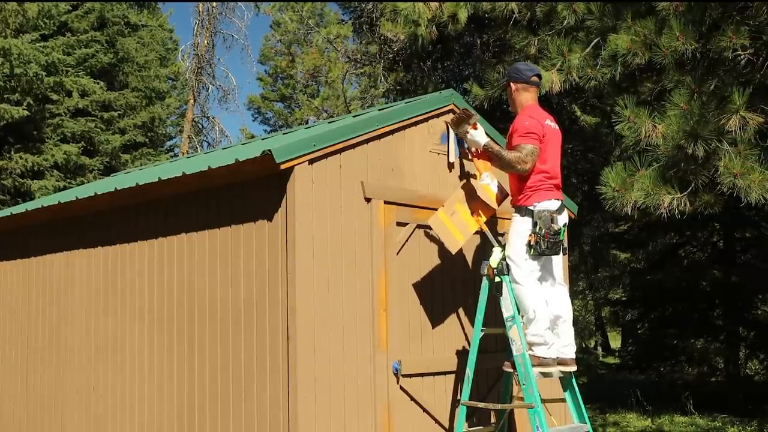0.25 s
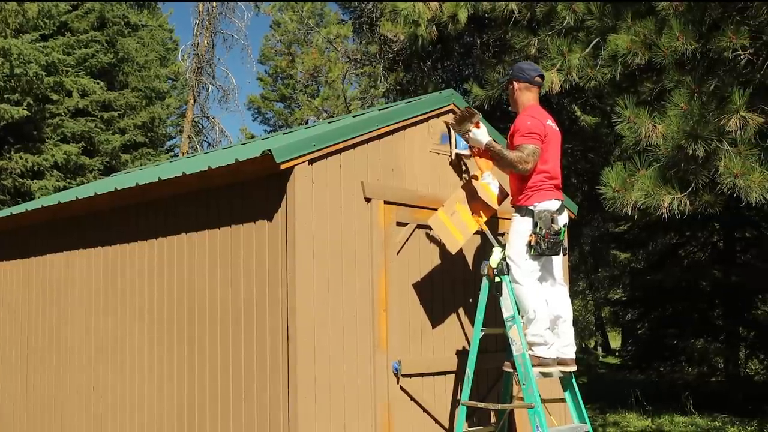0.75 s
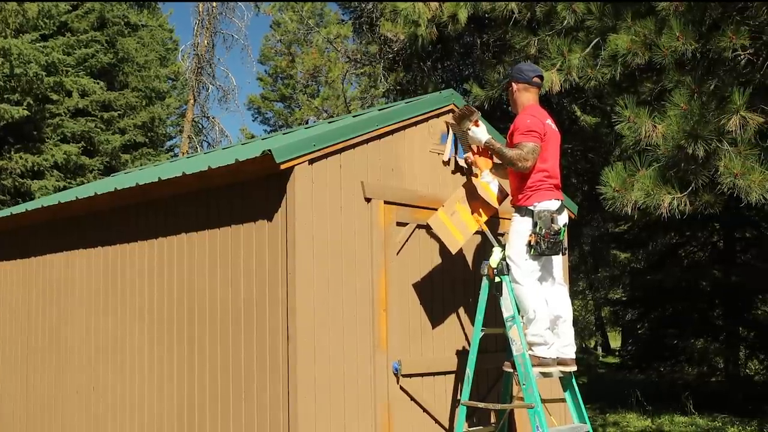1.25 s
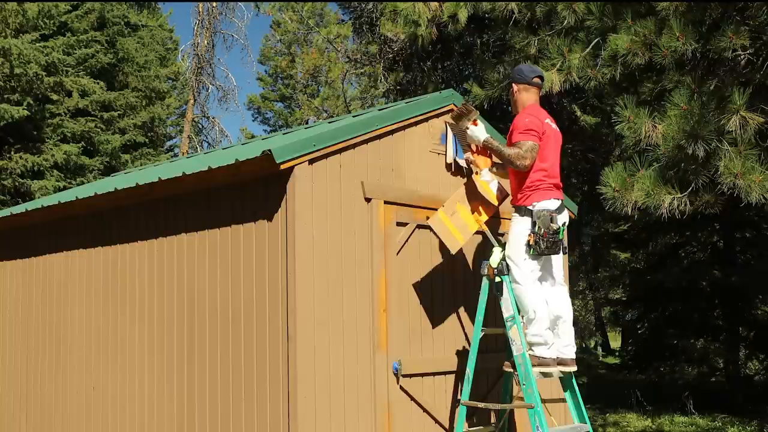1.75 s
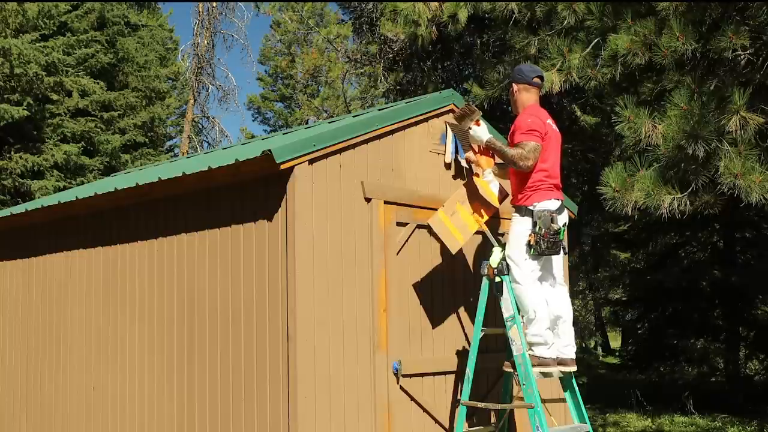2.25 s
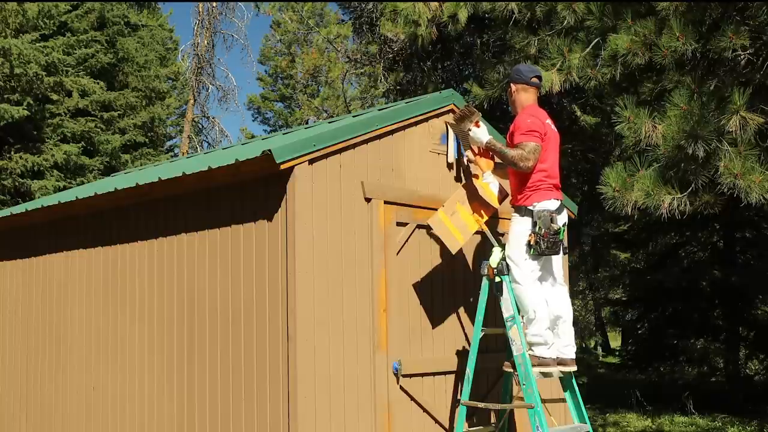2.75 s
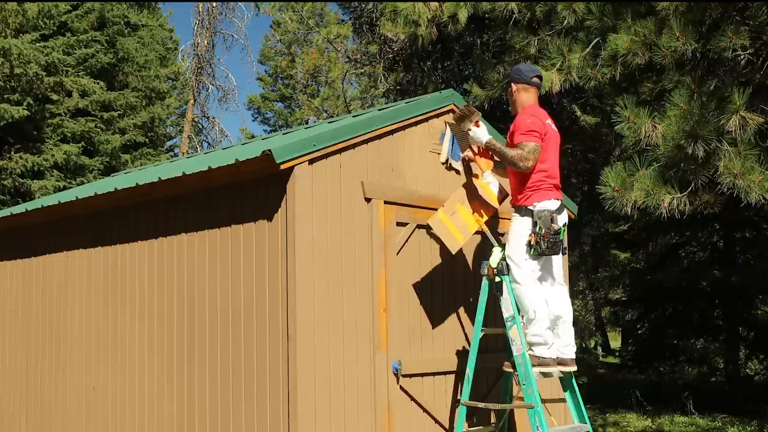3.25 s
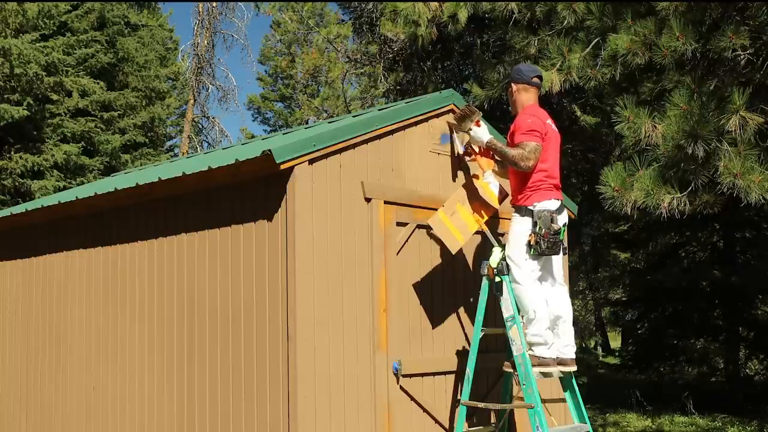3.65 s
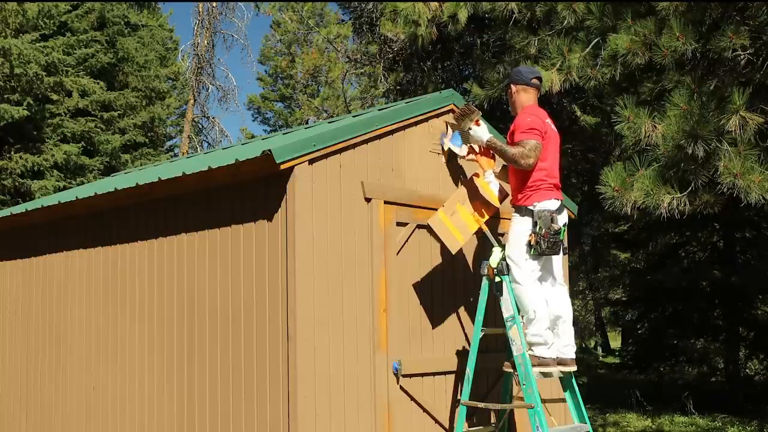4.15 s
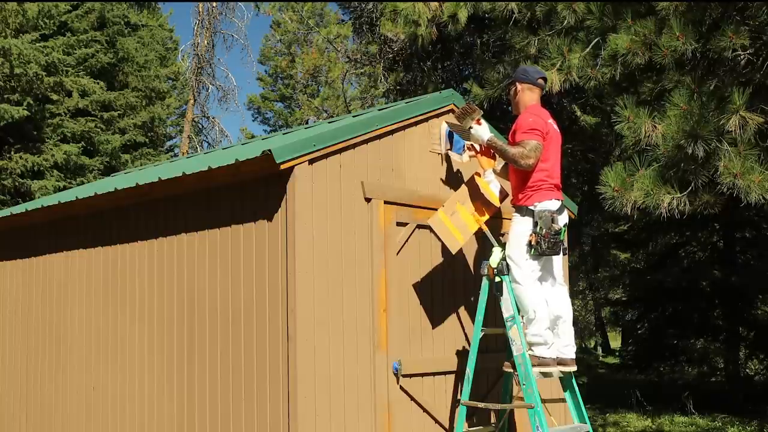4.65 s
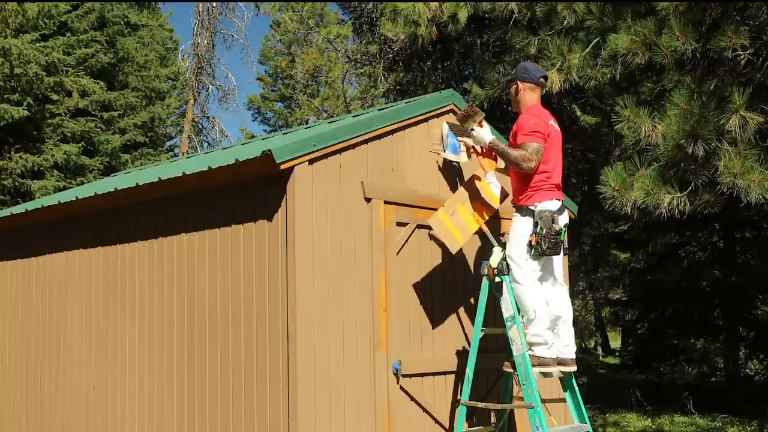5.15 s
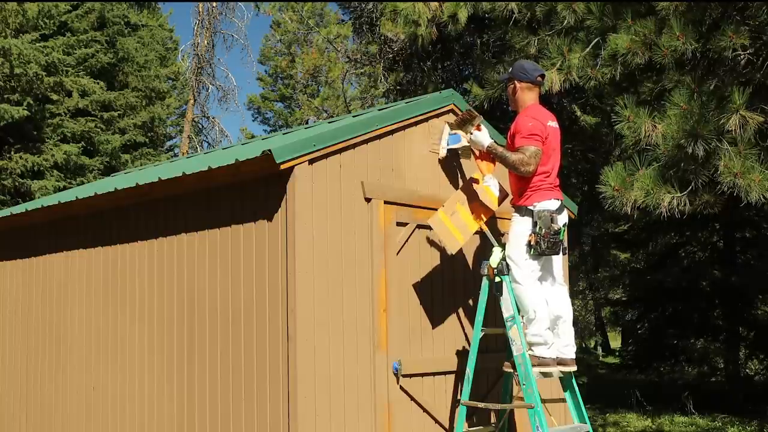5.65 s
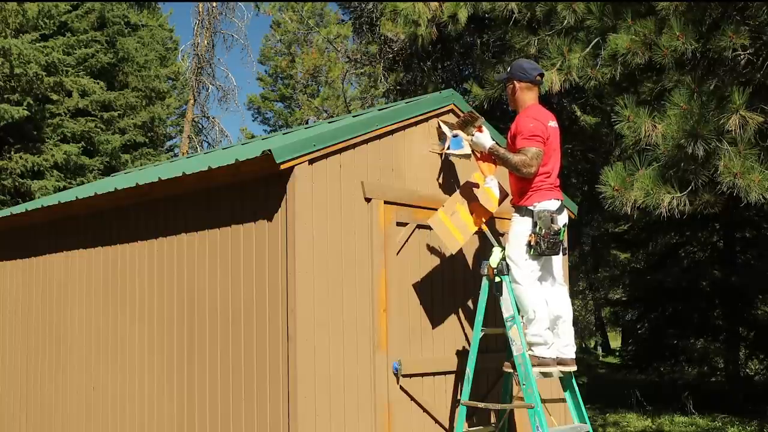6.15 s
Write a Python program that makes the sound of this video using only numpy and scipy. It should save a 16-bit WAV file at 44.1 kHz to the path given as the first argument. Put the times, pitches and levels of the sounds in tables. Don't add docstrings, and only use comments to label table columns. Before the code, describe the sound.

Close, dry sound of masking tape and paper being pulled off a hollow wooden wall outdoors. A crackling opening pull, a pause, a short thumping jerk, a quick rip, then a longer crackling pull and crumpling. After faint handling, a new grip leads into a finer, even peel. Very soft distant traffic and pine air lie beneath, almost no echo.

```python
import sys
import numpy as np
from scipy import signal
from scipy.fft import rfft, irfft, next_fast_len
from scipy.io import wavfile
from scipy.ndimage import uniform_filter1d, map_coordinates

SR = 44100
rng = np.random.default_rng(int(sys.argv[2]) if len(sys.argv) > 2 else 0)


def gain_from_decibels(decibels):
    exponent = np.asarray(decibels, float) / 20
    return 10 ** exponent


def to_wav(s):
    ch = np.atleast_2d(s).T
    pcm = np.round(np.clip(ch, -1, 1) * 32767)
    wavfile.write(sys.argv[1], SR, pcm.astype(np.int16))


N = 283122

# freq_hz, level_db
AIR_SPECTRUM = [(15, -35), (30, 2), (60, -2), (95, -1.5), (130, -8.5), (280, -18.5), (560, -16), (740, -12),
                (1100, -12.5), (1780, -15.5), (2000, -21.5), (2700, -29.5), (5000, -36.5), (11000, -41),
                (16000, -45)]
# time_s, level_db
AIR_LEVEL = [(0, -61), (.7, -58), (1.3, -59), (1.65, -57), (2.5, -61.5), (3.2, -61.5), (4.9, -61.5),
             (5.6, -59.5)]
# start_s, peak_db
THUDS = [
    (1.8556, -33),
    (1.8652, -25),
    (1.879, -31),
    (1.888, -34),
    (2.925, -30.5),
    (3.978, -33),
    (0.276, -31),
    (0.334, -51),
    (5.921, -32),
]
# start_s, peak_db
KNOCKS = [
    (4.475, -36),
    (4.549, -33),
    (4.561, -40),
    (4.618, -39),
]
# freq_hz, width_hz, level_db
WALL_MODES = [(95.9, 6.8, 1.5), (43, 18, -11.5), (177, 42, -13), (228.4, 13.8, -7), (348, 100, -9.5),
              (479, 95, -7.5), (785, 64, -7)]
# start_s, peak_db, slap_over_peak_db
TUGS = [(0.16, -56, 20), (0.205, -56, 23), (0.249, -45, 18), (0.327, -51, 22), (0.395, -56, 25),
        (0.679, -51, -4), (1.857, -40, -7), (1.878, -48, -6), (2.839, -44, 12.5), (2.9201, -31, 0),
        (2.93, -39.5, 5.5), (3.628, -40.5, -21), (3.864, -41.5, -17), (3.976, -33, -23), (4.222, -45, 12.5),
        (4.473, -53, 14), (4.573, -39, 10.5), (4.619, -45, 11), (4.724, -53.5, 14), (4.797, -74, 10),
        (5.163, -65, 26.5), (5.204, -71, 25), (5.283, -57.5, 17), (5.38, -62, 16), (5.919, -35.5, 9),
        (5.944, -33.5, -17), (5.974, -41, -5), (6.376, -45.5, 7)]
# start_s, peak_db, length_ms
FUMBLES = [(0.734, -46, 24), (0.766, -54, 33), (0.9882, -58, 22), (1.0365, -47, 7.9), (1.0827, -44, 31),
           (1.43, -47, 21), (1.7215, -53, 18), (1.7694, -63, 44), (2.008, -46, 13), (2.0437, -41.5, 40),
           (2.3875, -51.5, 43), (2.614, -49, 21), (2.72, -43, 22), (2.9644, -49.5, 37), (2.9944, -51, 38),
           (3.0759, -61, 18), (3.103, -47, 59), (3.1475, -48, 27), (3.254, -42.5, 38), (3.2895, -47, 22),
           (3.3094, -49, 20), (3.377, -37.5, 20), (4.901, -44, 53), (5.037, -42.5, 59), (5.078, -45, 36),
           (5.152, -41.5, 29), (5.1924, -43, 41), (5.2394, -48, 30), (5.3744, -40.5, 16), (5.448, -51, 35)]
# time_s, effort_db
OPENING = [(0, -77), (.14, -45.5), (.2, -43.5), (.29, -36.5), (.39, -36), (.41, -41.5), (.46, -39),
           (.61, -57.5), (.64, -76)]
JERK = [(1.85, -81), (1.858, -44), (1.905, -42), (1.925, -82), (1.975, -54.5), (1.992, -49), (2.0, -89),
        (2.03, -78)]
RIP = [(2.74, -63), (2.765, -54.5), (2.81, -42.5), (2.85, -50), (2.925, -42.5), (2.945, -62), (2.96, -66)]
PLUCK = [(3.37, -76), (3.47, -67.5), (3.56, -62), (3.605, -51.5), (3.625, -39.5), (3.66, -49.5), (3.7, -54)]
LONG = [(3.7, -53.5), (3.78, -49.5), (3.84, -46), (3.9, -41.5), (3.95, -38.5), (3.995, -41), (4.02, -43.5),
        (4.11, -48.5), (4.15, -60)]
CATCH = [(4.148, -67), (4.2, -68), (4.235, -43.5), (4.25, -67), (4.31, -78), (4.35, -61)]
CRUMPLE = [(4.35, -62), (4.43, -44.5), (4.55, -41.5), (4.585, -54.5), (4.63, -43), (4.665, -55.5),
           (4.69, -64), (4.85, -65.5), (4.875, -103)]
REGRIP = [(5.5, -74.5), (5.65, -69), (5.69, -55), (5.78, -58.5), (5.845, -52), (5.9, -48.5), (5.925, -38),
          (5.97, -50.5)]
EVEN = [(5.97, -47.5), (6.2, -44.5), (6.35, -44.5), (6.42, -39)]
# effort table, edge_over_tear_db, sheet_over_tear_db
HAND = [
    (OPENING, -1.1, 2.5),
    (JERK, -6.5, 7.3),
    (RIP, -2.7, 5.1),
    (PLUCK, 2.6, -0.65),
    (LONG, 2.1, 3.4),
    (CATCH, -0.97, 3.4),
    (CRUMPLE, -0.66, 6.2),
    (REGRIP, -3, 7.4),
    (EVEN, -0.88, 4.9),
]
# freq_hz, level_db
TEAR_SPECTRUM = [(880, 2), (1500, 4.5), (1840, 1.5), (3080, 2.5), (3380, 3), (5080, -3.5), (6040, -11),
                 (8500, -13), (11000, -31), (18700, -120)]
# freq_hz, level_db
SIZZLE_SPECTRUM = [(4120, -26.5), (7000, -8.5), (7520, -12), (13500, -9.5), (15700, -22.5), (16300, -19),
                   (16500, -27)]
# freq_hz, level_db
SHEET_SPECTRUM = [(71, -27), (120, 0), (227, 1), (290, -4.5), (465, -6), (574, -11), (798, -8.5),
                  (2000, -14.5), (2600, -18), (4400, -120)]
# start_s, end_s, from_hz, to_hz, level_db
STRIP = [(0.365, 0.383, 6300, 6000, -32), (0.527, 0.633, 3160, 3100, -57), (0.515, 0.615, 4600, 4400, -62),
         (2.752, 2.946, 12900, 12700, -56), (3.71, 3.917, 9000, 9650, -54), (3.894, 3.983, 6430, 7000, -40),
         (3.976, 4.003, 2980, 2950, -45), (3.988, 4.078, 8650, 7240, -51), (4.027, 4.142, 2210, 2120, -53),
         (5.38, 5.63, 920, 895, -63.5), (5.666, 5.736, 2190, 1900, -62), (5.674, 5.825, 1750, 1460, -58.5),
         (6.114, 6.6, 2080, 2580, -55), (6.338, 6.47, 8500, 8600, -58)]
# start_s, peak_db, centre_hz, length_ms
CREASES = [(0.2753, -27, 6000, 6), (0.3118, -26.5, 3500, 3), (0.3227, -21, 8000, 5.7),
           (0.372, -21, 6500, 3.2), (0.4193, -31.5, 7970, 4.4), (0.4466, -30, 6010, 6.4),
           (0.474, -31, 7000, 4.9), (0.528, -29, 4700, 1.8), (1.862, -45, 4600, 2.7),
           (1.8858, -46, 4470, 3.2), (1.907, -35.5, 9100, 3.5), (1.9809, -22, 7500, 1.6),
           (2.783, -33, 5900, 1), (2.8276, -41, 6960, 4.1), (2.9224, -30.5, 6600, 1.7),
           (3.5277, -29.5, 6800, 1.8), (3.6196, -45, 8800, 2.6), (3.865, -22, 4970, 1.2),
           (3.9126, -31, 7500, 1.6), (3.939, -21, 7400, 7.3), (3.988, -20.5, 9300, 3.7),
           (4.1805, -29.5, 4750, 6.3), (4.231, -27.5, 7140, 3.5), (4.261, -33.5, 7100, 3.8),
           (4.5288, -32, 5260, 3), (4.5642, -34, 4520, 2.3), (5.7443, -32.5, 6700, 2),
           (5.8637, -35, 4560, 1.64), (5.9108, -25.5, 4930, 1.2), (5.972, -32.5, 6900, 5.6)]
# start_s, peak_db, crisp_over_peak_db
FLAPS = [(0.624, -58, 14), (0.687, -39, -13), (0.849, -41.5, -23), (0.933, -46, -9), (1.9791, -26, -9.5),
         (2.235, -56.5, 9.5), (2.793, -31.5, 3.5), (3.392, -61, 16), (4.518, -40, 7.5), (4.565, -40, -6),
         (4.615, -36, 4), (4.637, -54, -1), (4.724, -53, 12), (4.797, -47, 0), (5.165, -35.5, -16),
         (5.205, -39.5, -9), (5.285, -48.5, -3), (5.385, -63, -15), (5.586, -46, -3.5), (5.662, -31.5, -16),
         (5.746, -38, -10), (5.767, -36, -4.5), (5.925, -46.5, 14), (5.995, -44, -3), (6.254, -49, -6)]
# start_s, peak_db, centre_hz
TICKS = [(0.5541, -23.5, 6600), (0.5654, -30, 9900), (0.624, -31, 6030), (0.6645, -30, 6510),
         (0.6675, -21.5, 6740), (1.897, -26.5, 4100), (2.0764, -40, 8250), (2.8093, -18, 9400),
         (2.9122, -19.5, 9350), (3.132, -42, 8800), (3.3587, -51, 4500), (3.3837, -36, 10100),
         (3.391, -40.5, 4300), (3.418, -33, 6600), (3.4495, -16.5, 9800), (3.5514, -28, 7030),
         (3.5676, -22.5, 6200), (3.6384, -24, 7300), (3.7763, -25, 8900), (3.8225, -21, 5530),
         (4.0025, -11, 8500), (4.174, -35, 4460), (4.1888, -21.5, 4670), (4.361, -17, 9000),
         (4.4191, -23, 4740), (4.7227, -58, 5960), (4.7553, -37.5, 6220), (4.8315, -35, 7000),
         (5.424, -43.5, 7340), (5.8488, -28.5, 4500),
         (0.139, -68, 3400), (0.519, -25, 3780), (0.85, -49, 4000), (1.8567, -28, 8890),
          (1.9674, -45, 7900), (1.986, -37, 3400), (2.0105, -48, 6470), (2.0457, -52, 6500),
          (2.6235, -47, 8560), (2.761, -32, 7070), (2.779, -32, 6350), (2.886, -35, 3800),
          (3.077, -49, 9700), (3.4534, -28, 6200), (3.4973, -44, 7310), (3.577, -33, 7040),
          (3.845, -20.5, 5830), (4.206, -32, 7000), (4.3034, -39, 9100), (4.333, -35, 6670),
          (4.396, -35, 6680), (4.429, -22.5, 6200), (4.5932, -29, 3670), (4.782, -39, 7030),
          (4.855, -42, 6990), (5.051, -47, 6970), (5.3068, -44.5, 8290), (5.724, -44, 4240),
          (5.8147, -43, 7550), (6.3716, -28, 8430),
         (0.0382, -62, 10740), (0.0604, -46, 10000), (0.6291, -42, 7500), (0.6884, -29, 8060),
        (0.7363, -46, 7400), (0.7659, -52, 9700), (0.771, -48, 9600), (0.8236, -48, 7200),
        (0.9816, -64, 9600), (0.9891, -46, 8900), (0.9935, -56, 8900), (1.006, -47, 10500),
        (1.0326, -49, 9900), (1.0848, -52, 8400), (1.3961, -47.5, 9500), (1.7233, -59, 6800),
        (1.9378, -48, 10000), (2.0305, -52, 7900), (2.0998, -58, 6700), (2.3328, -58, 7500),
        (2.4897, -56.5, 8000), (2.5816, -66, 7500), (2.6093, -57, 8800), (2.6139, -44, 9300),
        (2.6174, -50, 9700), (2.622, -54, 7700), (2.6283, -48, 8540), (2.6457, -51, 5600),
        (2.6667, -53, 7100), (2.6818, -53, 8100), (2.6996, -55, 10600), (2.9424, -39, 10900),
        (3.1067, -49, 8800), (3.129, -51, 7800), (3.224, -55, 9400), (3.265, -56, 8400),
        (3.2934, -46, 9900), (3.3866, -43, 13200), (3.393, -50, 9400), (3.4118, -43, 11300),
        (3.4385, -43, 8400), (3.4707, -39, 8200), (3.5064, -39, 7900), (4.285, -43, 8400),
        (4.3003, -39, 10900), (4.3112, -39, 8900), (4.3512, -52, 7500), (4.7, -36, 8500),
        (4.7663, -45, 8400), (4.797, -45, 7600), (4.8412, -42, 8600), (4.8896, -51, 6600),
        (4.8945, -44, 7200), (4.995, -53, 7460), (5.032, -43, 8600), (5.036, -57, 8600), (5.275, -50, 9000),
        (5.4512, -48, 7600), (5.6024, -52, 9900), (5.6648, -41, 6700)]
# start_s, peak_db, centre_hz
SLIPS = [(0.304, -28.5, 6400), (0.336, -32, 5000), (0.3847, -22, 6200), (0.434, -24, 6100),
         (0.438, -27, 7000), (0.449, -21, 6550), (0.482, -23, 7800), (0.4926, -21.5, 8050),
         (0.5117, -22, 8700), (0.5506, -44, 4600), (0.5673, -29, 6500), (0.609, -42, 4800),
         (0.6166, -38, 7000), (1.8621, -53, 5000), (1.8846, -38, 7100), (1.8896, -29, 9300),
         (1.9006, -33, 6300), (2.764, -40, 7100), (2.7832, -25.5, 10100), (2.8267, -30.5, 7800),
         (2.836, -38, 6700), (2.9147, -28.5, 9000), (2.941, -41, 9300), (3.594, -32, 7500),
         (3.5978, -29.5, 8500), (3.614, -26, 7900), (3.6748, -32, 7300), (3.7054, -32.5, 7700),
         (3.726, -42, 7000), (3.759, -27, 9100), (3.7658, -39, 9300), (3.769, -38, 7900), (3.78, -28, 8400),
         (3.789, -31, 8400), (3.793, -24.5, 9000), (3.8106, -31, 7100), (3.8567, -25.5, 8000),
         (3.871, -30, 7300), (3.9757, -16, 8600), (4.0512, -30, 7400), (4.1727, -26, 8200),
         (4.1994, -37, 6700), (4.238, -30, 7500), (4.37, -37, 6960), (4.3965, -44, 6500),
         (4.4703, -27, 7400), (4.611, -37, 5140), (4.629, -36, 9000), (4.6412, -40.5, 5370),
         (5.8663, -29.5, 3540), (5.8762, -29, 8400), (5.9584, -25.5, 7500), (5.987, -29, 7200),
         (5.996, -32.5, 1820), (6.073, -35, 4400), (6.145, -31, 6400), (6.1657, -30, 6400),
         (6.2671, -37, 7200), (6.2853, -43, 6400), (6.3747, -29.5, 3860)]
# start_s, peak_db, centre_hz
POPS = [(0.138, -39, 1390), (1.897, -39, 1420), (1.985, -39, 1150), (2.045, -47.5, 1640),
        (3.981, -30, 1380), (4.475, -34, 840), (4.519, -36, 820), (4.516, -37, 2100), (4.562, -35.5, 1030),
        (4.59, -37, 1020), (4.641, -34, 1760), (4.755, -50, 816), (5.21, -41, 900), (5.746, -36, 1720),
        (5.794, -41, 920), (5.865, -35.5, 1530), (5.918, -31, 1100), (5.992, -40, 1310), (6.122, -39, 2090),
        (0.276, -28, 2050), (0.322, -23.5, 2940), (0.3712, -25, 2800), (0.6233, -32.5, 3100),
        (0.668, -42, 2400), (0.5678, -36, 3100), (5.926, -41, 1800), (4.115, -35.5, 1270),
        (4.595, -34, 453), (4.52, -35.5, 450)]

TOP_HZ = 16000
STEADY_S = 5.99
GROUND_MS, GROUND_SHARE = 2.8, 0.17
THUD_HZ, THUD_T60_S = 188, 0.024
KNOCK_HZ, KNOCK_T60_S = 253, 0.048
TEAR_DB, SHEET_FOLLOWS, SHEET_PIVOT_DB, SHEET_RELEASE_S = -4.5, 0.69, -48, 0.013
HARD_GRAIN, GENTLE_GRAIN, EVEN_GRAIN = 0.89, 0.63, 0.85
GENTLE_FROM_DB, GENTLE_SPAN_DB = -57, -2
CREASE_BODY_DB, TICK_BODY_DB, SNAP_COLOUR_DB = -11.5, -23.5, 2.6
TICK_MS, SLIP_MS, POP_MS, FLAP_MS, FLAP_HZ = 0.94, 1.7, 3.9, 3.26, 2320
CRACKLE_DB, CRACKLE_SPREAD_DB, EVEN_CRACKLE_DB = 19.5, -5.5, -2
CRACKLE_HZ, CRACKLE_OCTAVES = 7700, 0.44
BROAD_SHARE, BROAD_HZ, NARROW_UNDER_S = 0.15, 700, 0.12


def unit(x):
    return x / np.sqrt(np.mean(x ** 2) + 1e-20)


def coloured(x, spectrum):
    m = next_fast_len(N + SR // 4)
    hz, db = np.transpose(spectrum)
    log_hz = np.log(np.fft.rfftfreq(m, 1 / SR) + 1)
    gain = gain_from_decibels(np.interp(log_hz, np.log(hz + 1), db))
    return unit(irfft(rfft(x, m) * gain, m)[:N])


def wobble(rate):
    knots = rng.standard_normal(int(N * rate / SR) + 4)
    return map_coordinates(knots, [np.arange(N) * rate / SR])


def patchy(depth_db):
    z = signal.stft(rng.standard_normal(N + 256), nperseg=256)[2]
    field = uniform_filter1d(rng.standard_normal(z.shape), 6, 0)
    field = uniform_filter1d(field, 10, 1)
    return signal.istft(z * gain_from_decibels(depth_db * unit(field)), nperseg=256)[1][:N]


def air():
    s, db = np.transpose(AIR_LEVEL)
    swell_db = np.interp(np.arange(N) / SR, s, db) + 1.0 + 0.12 * wobble(25.0)
    far = patchy(depth_db=0.9)
    ground = GROUND_SHARE * np.roll(far, round(GROUND_MS * SR / 1000))
    return gain_from_decibels(swell_db) * coloured(far + ground, AIR_SPECTRUM)


def trim():
    out, t = np.zeros(N + SR), np.arange(SR // 10) / SR
    for rows, hz, t60_s in [(THUDS, THUD_HZ, THUD_T60_S), (KNOCKS, KNOCK_HZ, KNOCK_T60_S)]:
        ring = np.sin(2 * np.pi * hz * t) * (1 - np.exp(-t / 0.0032))
        for s, db in rows:
            out[round(s * SR):][:len(t)] -= gain_from_decibels(db + 6.5 - 60 * t / t60_s) * ring
    return out[:N]


def wall(paper):
    m = next_fast_len(N + SR)
    f, t = np.fft.rfftfreq(m, 1 / SR), np.arange(SR // 20) / SR
    modes = []
    for k, (centre_hz, width_hz, db) in enumerate(WALL_MODES):
        drag = 1j * f * width_hz
        modes.append((-1) ** k * gain_from_decibels(db) * drag / (centre_hz ** 2 - f * f + drag))
    boom, slap = np.zeros((2, N + SR))
    push = t / 0.00088 * np.exp(1 - t / 0.00079)
    for s, db, slap_db in TUGS:
        start = round(s * SR)
        boom[start:][:len(t)] += gain_from_decibels(db + 22.0) * push
        u = t / (0.0009 if db > -45 else 0.0003)
        slap[start:][:len(t)] += gain_from_decibels(db + slap_db + 14.5) * u * np.exp(1 - u)
    rumble = unit(uniform_filter1d(rng.standard_normal(N), 40))
    hum = gain_from_decibels(4.5) * uniform_filter1d(np.abs(paper), 900) * rumble
    low = rfft(boom[:N] + gain_from_decibels(0.5) * hum, m) * sum(modes[:2])
    high = rfft(slap[:N] + hum, m) * sum(modes[2:])
    return irfft(low + high, m)[:N]


def fumbling():
    t, gain = np.arange(N) / SR, np.zeros(N)
    for s, db, ms in FUMBLES:
        u = (t - s) * 1000 / max(ms, 2)
        gain += gain_from_decibels(db - 18.5) * np.sin(np.pi * np.clip(u, 0, 1)) ** 0.5
    return gain


def levels():
    t, out = np.arange(N) / SR, np.zeros((3, N))
    for rows, edge_db, sheet_db in HAND:
        s, db = np.transpose(rows)
        effort_db = np.interp(t, s, db, -140, -140) + TEAR_DB
        swing_db = SHEET_PIVOT_DB + SHEET_FOLLOWS * (effort_db - SHEET_PIVOT_DB) + sheet_db
        out = np.maximum(out, gain_from_decibels([effort_db, effort_db + edge_db, swing_db]))
    keep = np.exp(-1 / (SHEET_RELEASE_S * SR))
    sheet = np.sqrt(signal.lfilter([1 - keep], [1, -keep], out[2] ** 2))
    return out[0], out[1], sheet


def breaks(count):
    where = rng.random(count)
    size = rng.exponential(size=count)
    pitch = rng.standard_normal(count)
    at = (where * (N - 2000) + 1000).astype(int)
    chance_db = 20 * np.log10(levels()[0][at]) + CRACKLE_DB + CRACKLE_SPREAD_DB * np.minimum(size, 2)
    chance_db = chance_db + EVEN_CRACKLE_DB * (at > STEADY_S * SR)
    chance_hz = np.minimum(CRACKLE_HZ * 2 ** (CRACKLE_OCTAVES * pitch), SR / 4)
    chance = zip(at / SR, chance_db, chance_hz)
    rows = [(*row, CREASE_BODY_DB) for row in CREASES]
    rows += [(s, db + crisp_db, FLAP_HZ, FLAP_MS, -crisp_db) for s, db, crisp_db in FLAPS]
    rows += [(*row, TICK_MS, TICK_BODY_DB) for row in [*TICKS, *chance]]
    rows += [(*row, SLIP_MS, TICK_BODY_DB) for row in SLIPS]
    rows += [(*row, POP_MS, TICK_BODY_DB) for row in POPS]
    return rows


def snaps():
    out, size, lead = np.zeros(N + SR), 1024, 200
    t, hz = (np.arange(size) - lead) / SR, np.fft.rfftfreq(size, 1 / SR)
    after = np.maximum(t, 0)
    creep = 0.088 * np.exp(np.minimum(t / 0.0011, -t / 0.0054))
    flap_band = (hz * 520 / (1020 ** 2 - hz ** 2 + 1j * hz * 520)) ** 2
    for s, db, centre_hz, ms, body_db in breaks(count=350):
        life_s = max(ms - 0.9, 0.2) / 1000
        shape = (1 - np.exp(-after / (0.12 * life_s))) * np.exp(-after / life_s) + creep
        a, b, c = rng.standard_normal((3, size))
        peaks = unit(uniform_filter1d(uniform_filter1d(c, size=24), size=24))[:len(hz)]
        colour = gain_from_decibels(SNAP_COLOUR_DB * min(centre_hz / 4000, 1) * peaks)
        a[lead + 2] += 2
        b[lead + 6] += 9
        width_hz = centre_hz ** 2 / 5200 + 500
        band = (hz * width_hz / (centre_hz ** 2 - hz ** 2 + 1j * hz * width_hz)) ** 2
        crisp = irfft(rfft(a * shape) * colour * band)
        slow = (1 - np.exp(-after / 0.000067)) * np.exp(-after / (life_s + 0.00019))
        flap = irfft(rfft(b * slow) * flap_band)
        burst = gain_from_decibels(db - 0.5) * crisp / np.abs(crisp).max()
        burst = burst + gain_from_decibels(db + body_db - 3.0) * flap / np.abs(flap).max()
        out[round((s + 0.0002) * SR) - lead:][:size] += burst
    return out[:N]


def strip(hiss):
    out, t = np.zeros(N), np.arange(N) / SR
    for start_s, end_s, from_hz, to_hz, db in STRIP:
        u = np.clip((t - start_s) / (end_s - start_s), 0, 1)
        glide_hz = from_hz + (to_hz - from_hz) * u
        turn = np.exp(2j * np.pi * np.cumsum(glide_hz) / SR)
        width_hz = (BROAD_SHARE * from_hz + BROAD_HZ) * min(from_hz / 2000, 1) ** 2
        if end_s - start_s < NARROW_UNDER_S and from_hz < 6400:
            width_hz *= 0.55
        band = signal.lfilter(*signal.butter(2, width_hz / SR), hiss / turn)
        out += gain_from_decibels(db) * np.sin(np.pi * u) ** 0.5 * unit((band * turn).real)
    return out


def slips(per_s, spread_db, life_ms):
    begins = rng.random(N) < per_s / SR
    size_db = spread_db * np.minimum(rng.exponential(size=N), 3.2)
    keep = np.exp(-1000 / (life_ms * SR))
    return unit(np.sqrt(signal.lfilter([1], [1, -keep], begins * gain_from_decibels(size_db) ** 2) + 1e-9))


def peeling():
    tear, sizzle, body = levels()
    faint = fumbling()
    gentle = np.clip((20 * np.log10(tear) - GENTLE_FROM_DB) / GENTLE_SPAN_DB, 0, 1)
    grain = HARD_GRAIN + (GENTLE_GRAIN - HARD_GRAIN) * gentle
    grain = np.where(faint * gain_from_decibels(-4) > tear, 1, grain)
    rough = [slips(per_s=3100, spread_db=6.0, life_ms=0.67) ** grain for _ in range(2)]
    dense = [slips(per_s=5500, spread_db=1.5, life_ms=0.12) ** EVEN_GRAIN for _ in range(2)]
    even = np.arange(N) > STEADY_S * SR
    grip, edge = np.where(even, dense, rough)
    white = patchy(depth_db=2.5)
    hiss = white * grip
    fine = white * np.sqrt(grip * edge)
    sheet = rng.standard_normal(N)
    rustle = slips(per_s=810, spread_db=12.0, life_ms=8.2) * gain_from_decibels(0.43 * wobble(30))
    sheet = sheet * rustle ** np.where(even, 0.6, grain)
    high = (tear + faint * gain_from_decibels(-5.0)) * coloured(hiss, TEAR_SPECTRUM)
    top = (sizzle + faint * gain_from_decibels(-7.0)) * coloured(fine, SIZZLE_SPECTRUM)
    return high + top + body * gain_from_decibels(-5.5) * coloured(sheet, SHEET_SPECTRUM) + strip(fine)


def scene():
    paper = peeling() + snaps()
    t = np.arange(SR // 8) / SR
    tail = rng.standard_normal(len(t)) * gain_from_decibels(-60 * t / 0.07)
    eaves = gain_from_decibels(-21.0) * signal.fftconvolve(paper, tail / np.linalg.norm(tail))[:N]
    return (paper + eaves + wall(paper) + trim() + air())[None]


def low_pass(x):
    return signal.sosfilt(signal.butter(12, 16990, fs=SR, output="sos"), x)


def record(dry):
    m = next_fast_len(N)
    passed = np.fft.rfftfreq(m, 1 / SR) < TOP_HZ
    mix = irfft(rfft(dry, m) * passed, m)[:, :N]
    return low_pass(mix)


dry = scene()
out = record(dry)
to_wav(out)
```